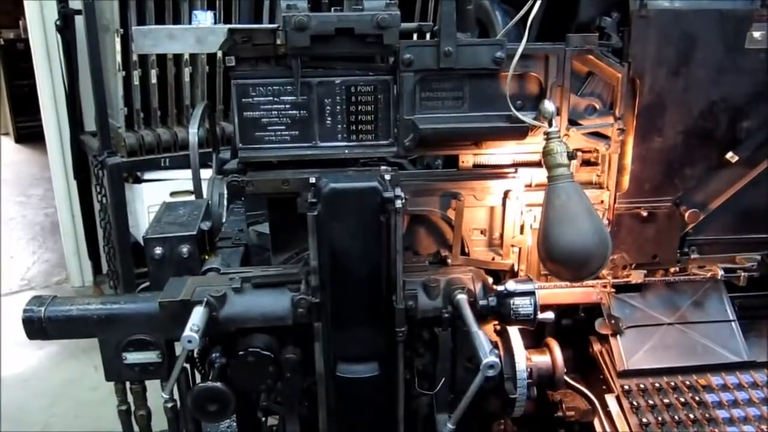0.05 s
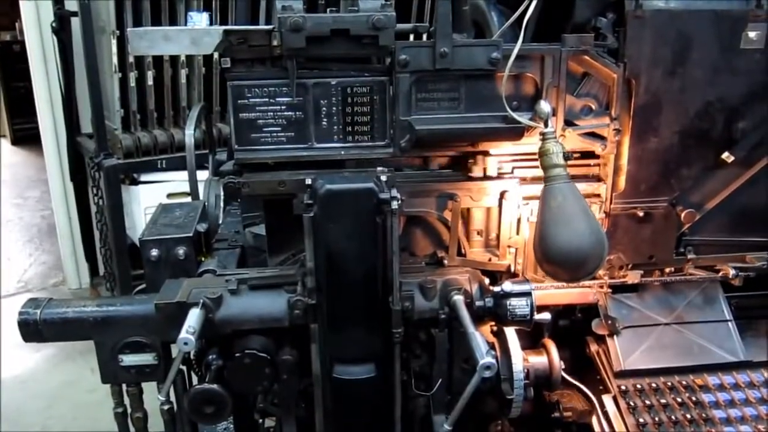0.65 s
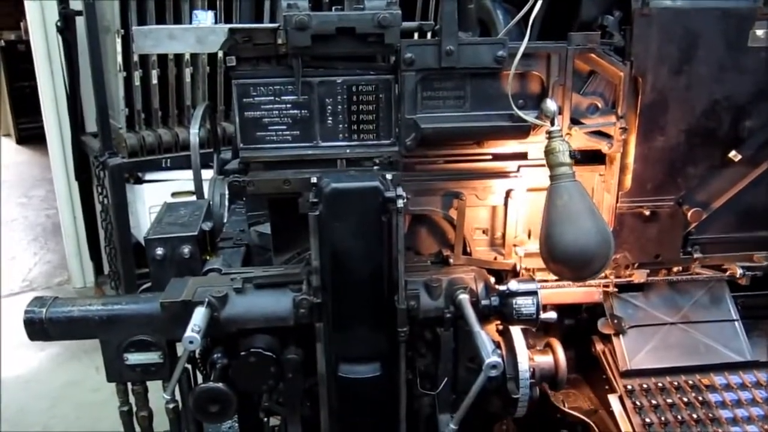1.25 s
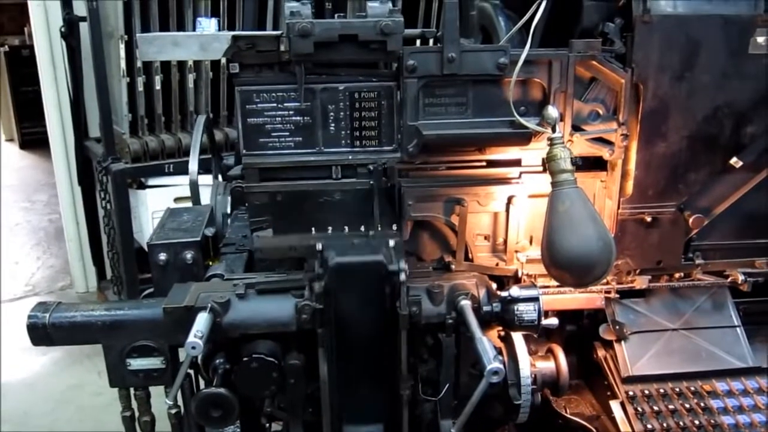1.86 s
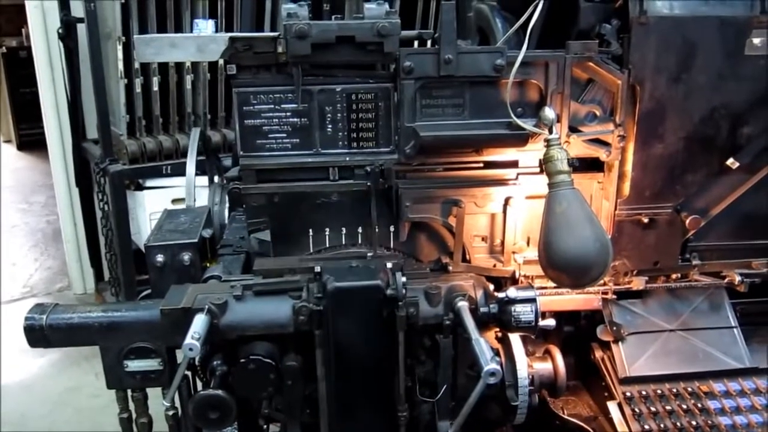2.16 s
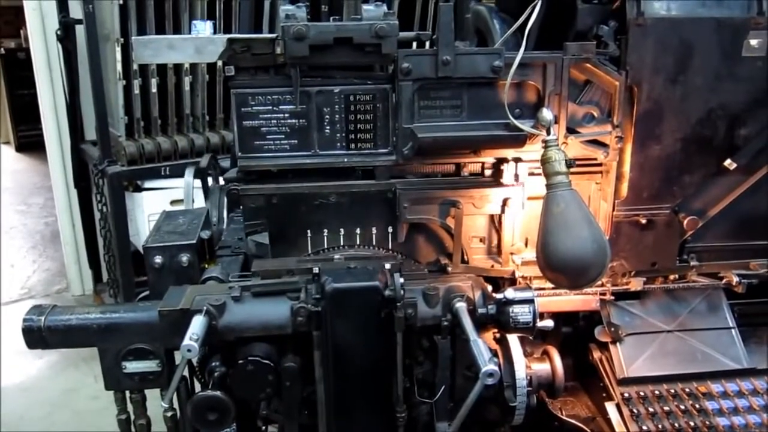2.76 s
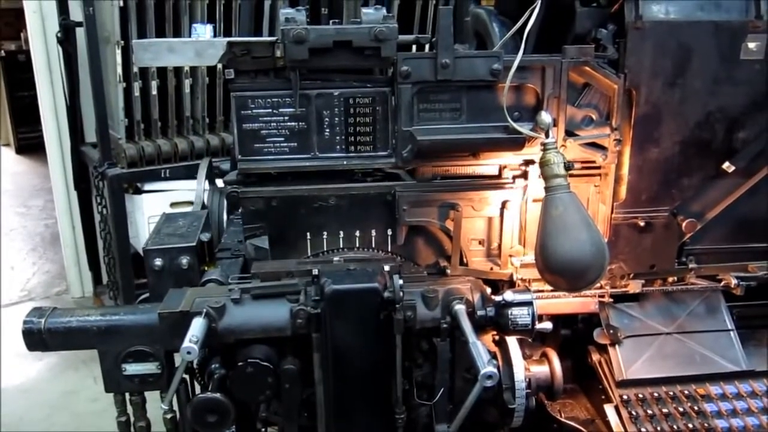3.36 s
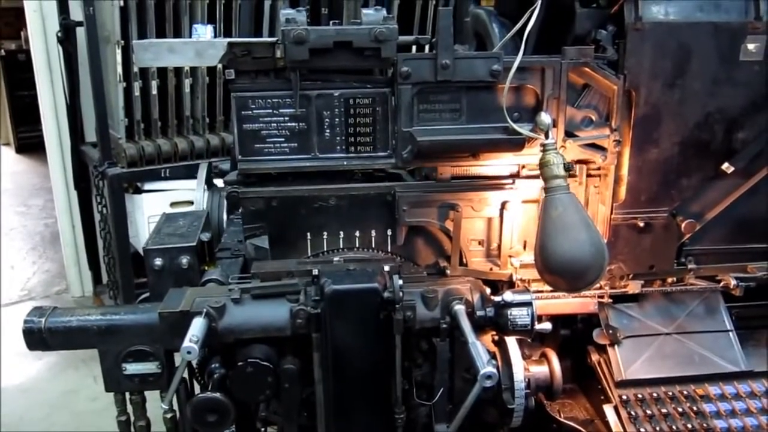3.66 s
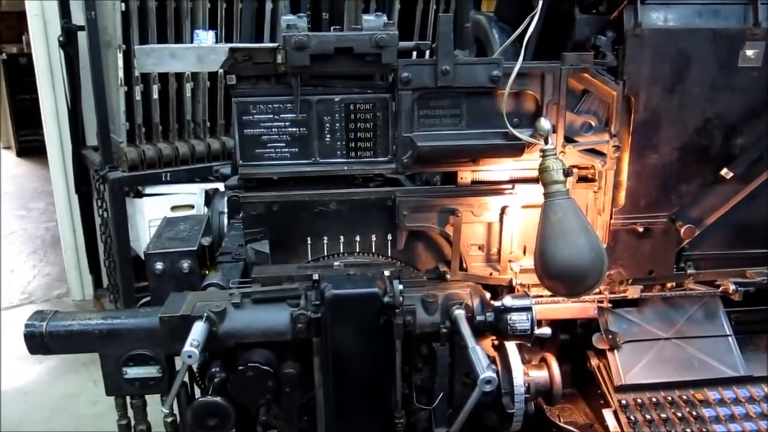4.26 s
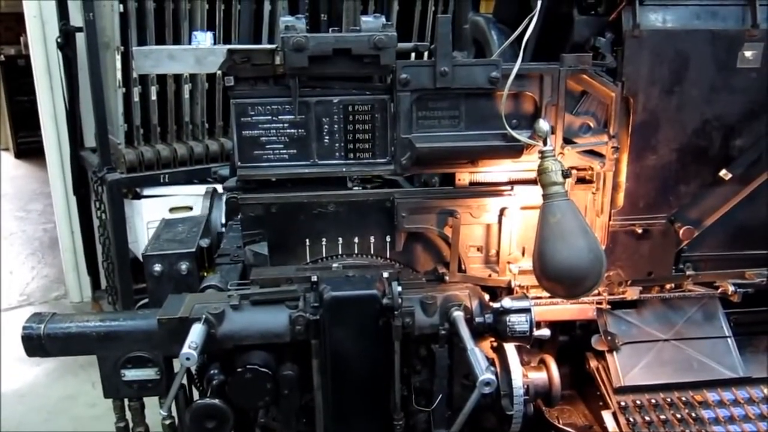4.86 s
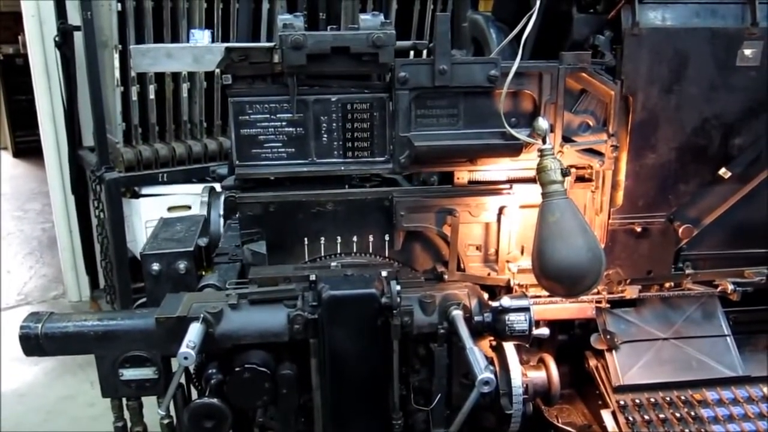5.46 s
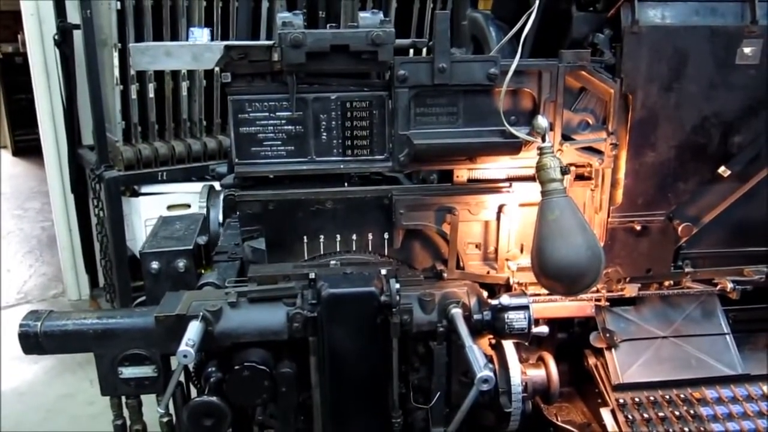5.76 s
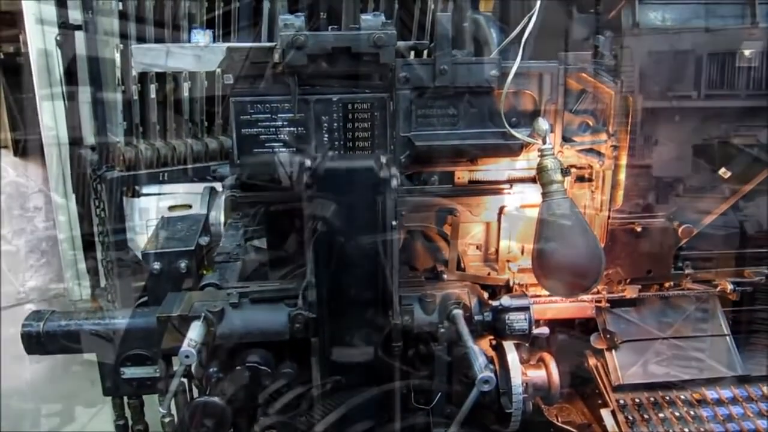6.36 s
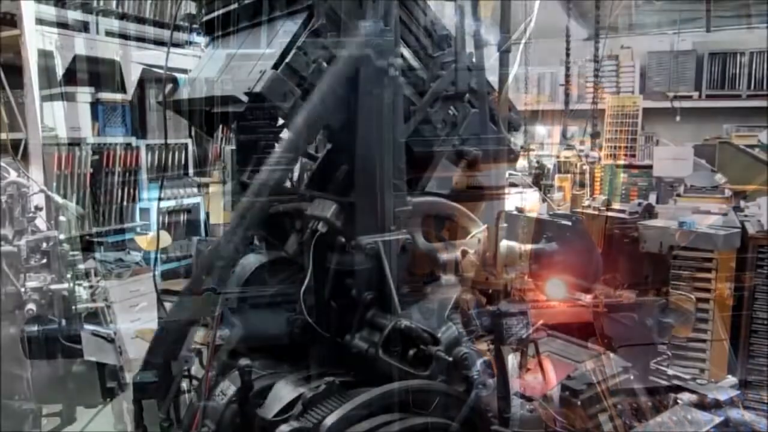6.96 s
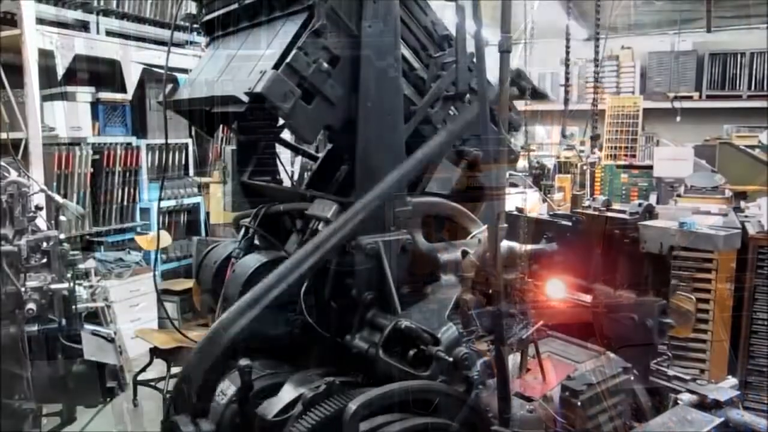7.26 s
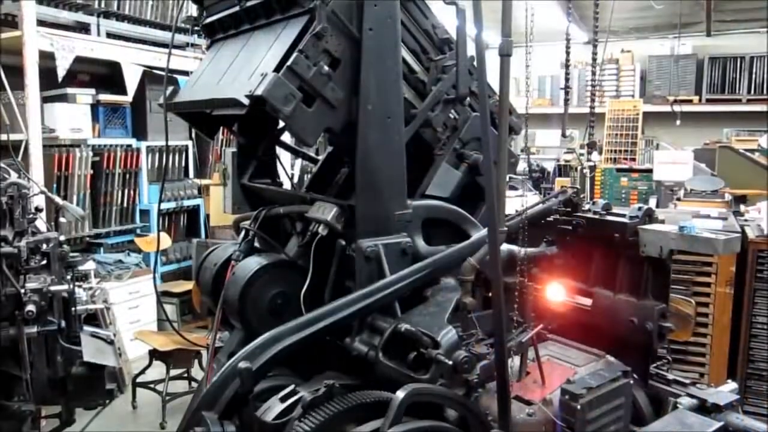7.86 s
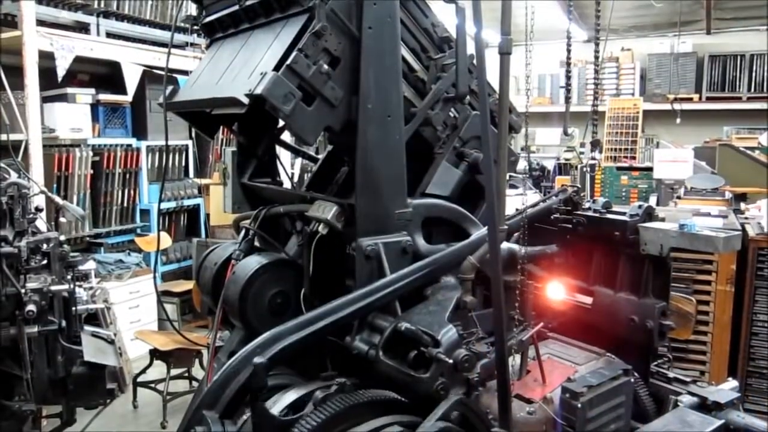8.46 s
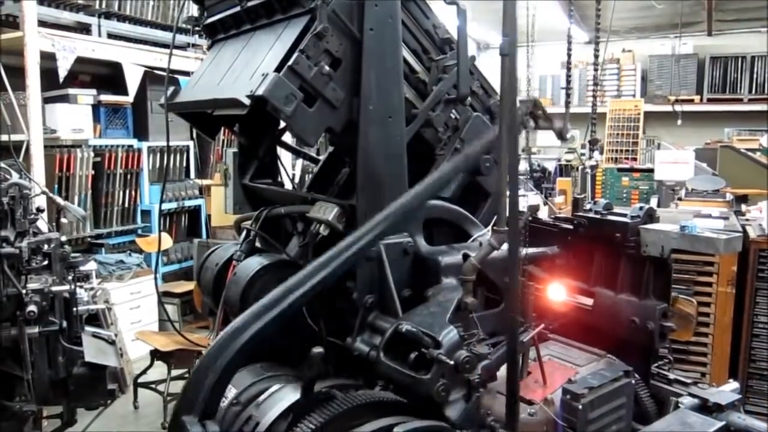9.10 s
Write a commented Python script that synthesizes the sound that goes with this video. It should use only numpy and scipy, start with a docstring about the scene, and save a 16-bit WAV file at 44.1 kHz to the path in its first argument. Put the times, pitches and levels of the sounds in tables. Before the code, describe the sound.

Close up in a workshop, a line-casting machine clanks and knocks unevenly over a steady motor rumble and a wavering gear whine. Carriages slide with a rattle and hiss, loose links chatter, and steel pieces give a brief bright jingle. After a lighter stretch with a sharp ping and a heavy thud, the machine gets busier: small brass moulds tick and drop, steel jingles in bursts and levers keep striking.

```python
"""A short rattling slide, then a clatter of steel blows: a line-casting machine runs through its cycle
in a print workshop, heard from close by. Cams throw levers against their stops, and heavy knocks add
a dull thud and a low ring. In between, carriages slide, loose links chatter, brass letter moulds
drop with a ping and thin steel pieces jingle, over the motor's rumble and its gears' wavering whine."""
import sys
import numpy as np
from scipy import signal
from scipy.fft import rfft, irfft, next_fast_len
from scipy.io import wavfile
from scipy.ndimage import uniform_filter1d

SR = 44100
rng = np.random.default_rng(int(sys.argv[2]) if len(sys.argv) > 2 else 0)


def inscribe(sig):
    """Save sig as 16-bit PCM at rate SR to the path in sys.argv[1].

    A 1-D sig is mono; a 2-D sig holds one channel per row.
    Samples are clipped to [-1, 1] before scaling.
    """
    pcm = np.round(np.clip(np.atleast_2d(sig).T, -1, 1) * 32767)
    wavfile.write(sys.argv[1], SR, pcm.astype(np.int16))


N = 402633


def amp(db):
    """Decibels to gain."""
    return 10 ** (np.asarray(db) / 20)


def unit(x):
    """Scales to rms 1."""
    return x / np.sqrt(np.mean(x ** 2) + 1e-20)


def curve_at(points, hz):
    """Reads a curve on a log-frequency axis."""
    f, value = np.transpose(points)
    return np.interp(np.log(hz + 1), np.log(f), value)


def automation(points):
    """Draws a line through (time, value) breakpoints, sample by sample."""
    return np.interp(np.arange(N) / SR, *np.transpose(points))


def add(mix, s, sound):
    """Mixes a sound into a stereo track at time s."""
    part = mix[:, max(round(s * SR), 0):][:, :sound.shape[1]]
    part += sound[:, :part.shape[1]]


def drift(rate_hz):
    """Slow random modulation of rms 1, rolling off above rate_hz."""
    hz = np.fft.rfftfreq(N, 1 / SR)[:4000]
    spectrum = rfft(rng.standard_normal(8192))[:4000] / (1 + (hz / rate_hz) ** 4)
    return unit(np.interp(np.linspace(0, 8191, N), np.arange(8192), irfft(spectrum, 8192)))


# Stereo image, narrow in the bass and wide on top: (frequency [Hz], left-right correlation [0..1])
STEREO_CORRELATION = [(30, 0.9), (150, .985), (500, 0.97), (950, 0.9), (1350, 0.83), (2000, 0.53),
                      (4000, 0.19), (8000, 0.56), (12000, 0.03)]


def colour(pair, eq_db=np.zeros_like):
    """Gives two unrelated signals a minimum-phase EQ (dB as a function of Hz) and the stereo image."""
    size = 2 * next_fast_len(pair.shape[1] // 2 + 1024)
    hz = np.fft.rfftfreq(size, 1 / SR)
    cepstrum = irfft(np.log(amp(eq_db(hz))))
    cepstrum[1:size // 2] *= 2  # folded forward, so nothing rings ahead of a hit
    cepstrum[size // 2 + 1:] = 0
    a, b = rfft(pair, size) * np.exp(rfft(cepstrum))
    correlation = curve_at(STEREO_CORRELATION, hz)
    mid, side = a * np.sqrt((1 + correlation) / 2), b * np.sqrt((1 - correlation) / 2)
    return irfft(np.array([mid + side, mid - side]))[:, :pair.shape[1]]


def ticks(per_s, spread_db):
    """Random tiny impacts of unequal size."""
    size = amp(spread_db * np.minimum(rng.exponential(1, N), 4))
    return size * (rng.random(N) < per_s / SR)


def contact_bed(spectrum, per_s, spread_db, decay_s, steady):
    """Many light, short contacts over even rubbing; steady is the rubbing's power relative to theirs."""
    power = signal.lfilter([1], [1, -np.exp(-2 / (decay_s * SR))], ticks(per_s, spread_db) ** 2)
    envelope = np.sqrt(power / power.mean() + steady)
    return unit(colour(envelope * rng.standard_normal((2, N)), lambda hz: curve_at(spectrum, hz)))


# Reverb time of the workshop: (frequency [Hz], t60 [s])
ROOM_DECAY = [(150, 0.7), (500, 0.35), (2000, 0.5), (5000, 0.52), (12000, 0.46)]


def workshop(send, build_s=0.0013):
    """Dense reflections from shelves and machines, each band dying at its own speed."""
    hz, t, bands = signal.stft(rng.standard_normal((2, SR)), SR, nperseg=256)
    bands = bands * amp(-60 * t / curve_at(ROOM_DECAY, hz)[:, None])
    tail = signal.istft(bands, SR, nperseg=256)[1]
    tail = colour(tail * (1 - np.exp(-np.arange(tail.shape[1]) / SR / build_s)))
    return signal.fftconvolve(send, tail / np.linalg.norm(tail[0]), axes=1)[:, :N]


# Load on the drive, which also rides the chatter and the light taps: (time [s], level [dB])
DRIVE_LOAD = [(0.0, -33), (0.46, -39.5), (1.02, -34), (1.17, -41), (1.42, -43.5), (1.6, -39.5), (1.86, -36),
              (2.52, -46.5), (3.23, -40), (4.32, -41), (4.5, -45.5), (4.78, -46.5), (5.29, -40.5),
              (5.87, -38.5), (6.13, -36), (7.14, -38.5), (7.27, -35.5), (7.98, -41.5), (8.21, -40),
              (9.13, -42.5)]
USUAL_LOAD_DB = -40
# EQ of the motor and belts: (frequency [Hz], gain [dB])
RUMBLE_EQ = [(20, -40), (45, -9), (85, -10.5), (130, -5.5), (230, 2.5), (290, 2), (340, 4), (420, -2),
             (650, 2.5), (1000, -5.5), (2000, -8), (6000, -46)]
# Hum and gear tones: (pitch [Hz], level at usual load [dB], pitch waver [ratio], level flutter [ratio])
DRIVE_TONES = [(61, -65.5, 0.0024, 0.3), (120.8, -61, 0.0023, 0.89), (235.3, -51, 0.00854, 1),
               (339.8, -48.5, 0.0113, .8), (358, -45.5, 0.0049, 0.54)]


def drive():
    """Motor and belts rumble; hum and gear tones waver; both swell with the load."""
    load_db = automation(DRIVE_LOAD)
    rumble = contact_bed(RUMBLE_EQ, per_s=69, spread_db=5.5, decay_s=0.0058, steady=6.3)
    tones = np.zeros(N)
    for hz, db, waver, flutter in DRIVE_TONES:
        turns = np.cumsum(hz * (1 + waver * drift(rate_hz=4.15))) / SR
        tones += amp(db) * unit((1 + flutter * drift(rate_hz=9.5)) * np.sin(2 * np.pi * turns))
    return rumble * amp(load_db + 1.5) + tones * amp(load_db - USUAL_LOAD_DB)


def travel(start, end, rise_s=0.021, fall_s=0.043):
    """Envelope of a movement: it gathers speed, runs evenly and dies away after its end."""
    t = np.arange(N) / SR
    return np.clip((t - start) / rise_s, 0, 1) * np.exp(-np.maximum(t - end, 0) / fall_s)


# EQ of the shaking base: (frequency [Hz], gain [dB])
BASE_EQ = [(20, -12), (40, -3), (70, 0), (120, 3), (200, -4), (600, -45)]
# A carriage or elevator travels along its guide:
# (start [s], end [s], rattle [dB], hiss [dB], base rumble [dB], guide pitch [Hz])
SLIDE_CUES = [(0.0, 0.21, -41, -62, -41.5, 3300), (0.42, 0.704, -37.5, -42, -58, 4260),
              (0.73, 1.176, -33.5, -39.5, -50.5, 4300), (1.414, 1.552, -27.5, -47, -49, 1820),
              (1.994, 2.128, -32.5, -31, -65, 2380), (2.318, 2.457, -30, -55, -70, 2750),
              (2.943, 3.446, -40, -50, -59, 5600), (4.1, 4.377, -40, -61, -52, 2400),
              (5.14, 5.63, -42.5, -44, -62, 4100), (5.746, 6.3, -35.5, -46, -52.5, 2350),
              (6.323, 6.62, -27, -40.5, -48.5, 2170), (6.71, 7.15, -34.5, -33.5, -69, 3580),
              (7.352, 7.492, -28.5, -33, -60, 2250), (7.696, 7.907, -33, -37.5, -58, 3700),
              (8.228, 8.433, -28.5, -37, -67, 2200), (8.742, 8.873, -30, -41, -60, 1980)]


def slides(guide_db=-10, guide_q=10):
    """The moving carriages make their guides sing and shake the base."""
    guides, shaking = np.zeros((2, N)), np.zeros(N)
    rubbing = colour(rng.standard_normal((2, N)))
    for start, end, rattle_db, _, base_db, hz in SLIDE_CUES:
        moving = travel(start, end)
        ring = unit(signal.lfilter(*signal.iirpeak(hz, guide_q, SR), rubbing))
        guides += ring * amp(rattle_db + guide_db) * moving
        shaking += amp(base_db) * moving
    base = unit(colour(rng.standard_normal((2, N)), lambda hz: curve_at(BASE_EQ, hz)))
    return guides + shaking * base


def clinks(per_s, low_hz, high_hz, ring_s, spread_db, count=24, stereo_lag_s=0.00007):
    """Small brass pieces tap their guides, each with its own pitch and place in the stereo image."""
    t = np.arange(2048) / SR
    taps, piece = ticks(per_s, spread_db), rng.integers(0, count, N)
    lags = stereo_lag_s * rng.standard_normal(count)
    pitches = np.geomspace(low_hz, high_hz, count) * rng.uniform(1.0, 1.03, count)
    notes = [np.sin(2 * np.pi * hz * np.array([t, t + lag])) * np.exp(-t / ring_s)
             for hz, lag in zip(pitches, lags)]
    out = np.zeros((2, N))
    for at in np.flatnonzero(taps):
        add(out, at / SR, taps[at] * notes[piece[at]])
    return unit(out)


# EQs of the loose links and of the hiss of bearings and slides: (frequency [Hz], gain [dB])
LINK_EQ = [(250, -16.5), (600, 0), (1000, 2.5), (1500, 2.5), (2300, 5), (3100, 3.5), (4300, 0.5),
           (6500, -11), (9000, -9), (15000, -69)]
HISS_EQ = [(1500, -24), (4000, -15), (6500, 5), (9500, 1), (12000, 1.5), (15000, -14)]


def chatter(loose_db=4, bearings_db=-12.5):
    """Links tick, brass clinks and bearings hiss with the load; each slide adds rattle and hiss."""
    load_db = automation(DRIVE_LOAD)
    rattle_gain, hiss_gain = amp(load_db + loose_db), amp(load_db + bearings_db)
    for start, end, rattle_db, hiss_db, _, _ in SLIDE_CUES:
        moving = travel(start, end)
        rattle_gain = np.hypot(rattle_gain, amp(rattle_db) * moving)
        hiss_gain = np.hypot(hiss_gain, amp(hiss_db) * moving)
    links = contact_bed(LINK_EQ, per_s=290, spread_db=5.5, decay_s=0.01, steady=1.0)
    brass = clinks(per_s=110, low_hz=1800, high_hz=6500, ring_s=0.0025, spread_db=3) * amp(-10)
    hiss = contact_bed(HISS_EQ, per_s=220, spread_db=4.0, decay_s=0.0063, steady=0.86)
    return (links + brass) * rattle_gain + hiss * hiss_gain


def light_taps(count=45, usual_db=-36, load_share=1.14, spread_db=5, low_hz=1000, high_hz=5000):
    """Pawls and links tap at random all through the cycle, harder under load."""
    load_db = automation(DRIVE_LOAD)
    out = np.zeros((2, N))
    for k, (when, force, pitch) in enumerate(rng.random((count, 3))):
        at = int((k + when) / count * N)
        level_db = usual_db + load_share * (load_db[at] - USUAL_LOAD_DB) + spread_db * (force - 0.5)
        hz = low_hz * (high_hz / low_hz) ** pitch
        add(out, at / SR, blow(level_db, decay_s=0.018, thud_db=8, bright_db=1, peak_hz=hz, peak_db=11))
    return out


# Modes of the thin steel pieces: (frequency [Hz], level [dB], t60 [s])
JINGLE_MODES = [(2180, -3, .05), (3400, -12, .05), (5000, 0.5, 0.12), (6240, -4, 0.15), (6600, -5.5, 0.067),
                (8930, -2, 0.099), (10740, -3, 0.08), (10830, -4, 0.08), (12300, 0, 0.086),
                (14360, -17, .07), (14640, -14, .07)]
# Their bouts of jingling: (start [s], end [s], level [dB])
JINGLE_CUES = [(1.591, 1.63, -27), (1.626, 1.65, -26.5), (1.693, 1.75, -45), (3.242, 3.252, -48),
               (3.3, 3.312, -40), (6.199, 6.23, -27.5), (6.232, 6.391, -32), (6.444, 6.66, -41),
               (6.74, 7.166, -36), (7.291, 7.497, -30.5), (7.599, 7.73, -42), (7.727, 7.80, -32),
               (7.829, 7.93, -41.5), (8.091, 8.237, -29.5), (8.30, 8.43, -40)]


def jingle(knocks_per_s=65, mistune=0.011, softest_db=-6, force_db=13, rise_s=0.0016, settle_db_per_s=18):
    """Thin steel pieces, alike but never quite in tune, are jolted, then knock together as they settle."""
    t = np.arange(4096) / SR
    hz, db, t60 = np.transpose(JINGLE_MODES)[:, :, None]
    decays = amp(db - 60 * t / t60) * (1 - np.exp(-t / rise_s))
    decays /= np.sqrt(np.sum(decays ** 2) / 2 * knocks_per_s / SR)
    out = np.zeros((2, N))
    for start, end, level_db in JINGLE_CUES:
        draws = rng.random((32, 3 + 3 * len(hz)))
        draws[0, :3] = 0, 1, 0.5  # the jolt is prompt, full and in tune
        for since, chance in zip(np.arange(0, end - start, 1 / knocks_per_s), draws):
            late, force, piece = chance[:3]
            weight, phase, lead = chance[3:].reshape(3, -1, 1)  # each knock wakes the modes differently
            turns = hz * (1 + mistune * (2 * piece - 1)) * t + np.array([phase, phase + lead / 2])
            knock = ((0.5 + weight) * decays * np.sin(2 * np.pi * turns)).sum(1)
            knock_db = level_db + softest_db + force_db * force - settle_db_per_s * since
            add(out, start + since + late / knocks_per_s, amp(knock_db) * knock)
    return out


# Hard landings of small brass pieces, mostly letter moulds: (time [s], level [dB], pitch [Hz])
PING_CUES = [(1.623, -16, 2240), (3.021, -19.5, 5300), (3.599, -11.5, 5200), (3.605, -13.5, 4780),
             (5.858, -21, 2570), (5.92, -12, 2260), (6.024, -17.5, 2120), (6.173, -22, 3000),
             (6.639, -13.5, 2170), (6.72, -15.5, 2270), (6.845, -16, 3650), (6.921, -15.5, 3610),
             (7.024, -16.5, 2190), (7.112, -22, 3350), (8.397, -9, 2080), (8.903, -19, 2880)]


def falling_moulds(run_start_s=5.9, run_end_s=7.3, run_db=-38):
    """A run of brass moulds ticks into the channels; hard landings through the cycle click and ping."""
    run = clinks(per_s=28, low_hz=2050, high_hz=3500, ring_s=0.005, spread_db=1)
    out = run * amp(run_db) * travel(run_start_s, run_end_s)
    for s, ping_db, hz in PING_CUES:
        add(out, s, blow(ping_db - 11, decay_s=0.0047, thud_db=3, bright_db=1, peak_hz=hz, peak_db=16))
        add(out, s, clean_note(hz, ping_db - 1, ring_s=0.0079))
    return out


# Modes of the cast-iron frame: (frequency [Hz], level [dB], t60 [s])
FRAME_MODES = [(118, -19, 0.21), (156.6, -9.5, 0.091), (192, -4, 0.19), (222, 1.5, 0.11), (232, -11, 0.21),
               (251.2, -1, 0.23), (488, -5.5, 0.08)]
# Heavy knocks: (time [s], low ring [dB], dull thud [dB])
KNOCK_CUES = [(0.05, -34, -30), (1.187, -55, -32), (1.456, -29, -42), (1.53, -35, -40), (2.03, -33, -44),
              (2.339, -48, -21), (3.349, -41, -48), (4.384, -31.5, -7), (5.881, -22, -45),
              (6.349, -30, -38), (6.675, -24.5, -42), (6.868, -36, -48), (7.668, -23.5, -29),
              (8.308, -25.5, -44), (8.353, -30, -46), (8.378, -29.5, -46)]


def heavy_knocks(thud_s=0.00047, thud_rise_s=0.00036, ring_rise_s=0.0041, mistune=0.043):
    """Heavy knocks give a short, dull low thud and a low ring."""
    t = np.arange(SR // 2) / SR
    out = np.zeros((2, N))
    thud = 2 * (1 - t / thud_s) * np.exp(-t / thud_s) * (1 - np.exp(-t / thud_rise_s))
    for s, ring_db, thud_db in KNOCK_CUES:
        ring = np.zeros(len(t))
        for hz, db, t60 in FRAME_MODES:
            polarity, detune = rng.standard_normal(2)  # each spot wakes the modes differently
            mode = np.sin(2 * np.pi * hz * (1 + mistune * detune) * t)
            ring += np.sign(polarity) * amp(db - 60 * t / t60) * mode
        ring *= 1 - np.exp(-t / ring_rise_s)
        add(out, s, (amp(ring_db) * ring + amp(thud_db) * thud)[None])
    return out


# EQ of steel striking steel: (frequency [Hz], gain [dB])
STEEL_EQ = [(30, -27.5), (90, -55), (170, -12), (280, -8), (430, -4), (890, 1), (1590, -0.5), (2340, 3),
            (3930, 1), (6600, -5), (9700, -8.5), (12000, -14.5), (15000, -25.5)]


def blow(level_db, decay_s, thud_db, bright_db, peak_hz, peak_db, pan_db=0):
    """Metal lands with a crack, a burst of micro-contacts and a short ring, broadly resonant at peak_hz."""
    crack_db, crack_s, ring_db, ring_s = -1, 0.0013, -17, 0.033
    t = np.arange(8192) / SR
    roughness_db = 2.03 * unit(uniform_filter1d(rng.standard_normal(len(t)), size=50))
    contacts = np.exp(-t / decay_s) * (1 - np.exp(-t / (0.36 * decay_s))) * amp(roughness_db)
    crack = amp(crack_db) * np.exp(-t / crack_s)
    ring = amp(ring_db) * np.exp(-t / ring_s) * (1 - np.exp(-t / decay_s))
    envelope = np.hypot(contacts + crack, ring)
    envelope /= np.sqrt(np.sum(envelope ** 2) / (0.02 * SR))  # the energy of 20 ms at rms 1
    modes_hz = np.exp(rng.uniform(np.log(1500), np.log(14000), 18))

    def eq_db(hz):
        thud = thud_db / (1 + (hz / 800) ** 2)
        edge = bright_db * hz ** 4 / (hz ** 4 + 6000 ** 4)
        resonance = 14 * np.tanh(peak_db / 14) / (1 + ((hz - peak_hz) / (80 + 0.16 * peak_hz)) ** 2)
        off_mode = np.min(abs(hz[:, None] - modes_hz) / (25 + modes_hz / 110), axis=1)
        clang = 7 / (1 + off_mode ** 2) - 2  # each piece has sharp modes of its own, a few dB proud
        return level_db + curve_at(STEEL_EQ, hz) + thud + edge + resonance + clang
    return colour(envelope * rng.standard_normal((2, len(t))), eq_db) * amp([[pan_db / 2], [-pan_db / 2]])


def clean_note(hz, level_db, ring_s=0.0074, rise_s=0.00021, low_cut_hz=1700):
    """The short, clean note of struck metal; it fades out below about 1.7 kHz."""
    t = np.arange(8192) / SR
    stereo_phase = rng.random() + np.array([[0], [hz / 15000 * rng.standard_normal()]])
    note = np.sin(2 * np.pi * (hz * t + stereo_phase)) * np.exp(-t / ring_s) * (1 - np.exp(-t / rise_s))
    return amp(level_db + curve_at(STEEL_EQ, hz)) * note / (1 + (low_cut_hz / hz) ** 4)


# Steel blows, mostly levers hitting their stops, some carriages bumping and scraping along their guides: #
# (time [s], level [dB], rattle decay [s], thud [dB], brightness [dB], centre of the blow's broad resonance
# [Hz])
BLOW_CUES = [(0.251, -18, 0.011, 9, 8.5, 3370), (0.274, -13, 0.0075, 1, 2, 1500),
             (0.287, -22, 0.0095, -18, 18.5, 4160), (0.297, -21.5, 0.0041, -11, 20.5, 3670),
             (0.321, -10.5, 0.012, -14, 6, 1330), (0.42, -19, 0.0062, -15, -4, 2700),
             (0.486, -22.5, 0.034, -11, 6, 4180), (0.591, -21, 0.032, -1, 3.5, 4270),
             (0.709, -33, .009, 7, 23.5, 6200), (0.731, -16, .035, 4, 6, 4040),
             (0.953, -22.5, 0.014, 3, 3, 4140), (1.067, -15, 0.015, 2, 1, 4230),
             (1.103, -25, 0.019, 16, 8, 4160), (1.18, -25, 0.0033, 8, 15, 3500),
             (1.185, -14, 0.0087, 2.5, -8, 3430), (1.189, -15, 0.0057, -2, 4.5, 930),
             (1.368, -11.5, 0.015, -16, -1, 780), (1.453, -11.5, .008, -6, -8, 2580),
             (1.463, -15.5, .014, 3.5, -6, 1140), (1.533, -13.5, .009, -18, -22, 1120),
             (1.593, -24, 0.015, 7, 7, 4800), (1.639, -10.5, .011, -14, -2.5, 1290),
             (1.701, -22.5, .02, -7, 12.5, 1600), (1.887, -25.5, .01, 12, -15, 1870),
             (1.953, -13.5, 0.0049, -26, 2.5, 1510), (1.98, -12.5, 0.007, -12, -24, 736),
             (2.028, -14, .005, -9, -1, 2270), (2.062, -8.5, 0.007, -20, -4, 2000),
             (2.078, -15.5, 0.0062, -2, 4, 754), (2.136, -21.5, 0.0099, 2, -19, 550),
             (2.215, -27, 0.014, 11, -19, 1760), (2.281, -26.5, 0.0088, 14.5, 11, 3830),
             (2.337, -12, 0.0014, -16, 7.5, 690), (2.381, -10.5, 0.029, -28, -1, 610),
             (2.447, -26.5, 0.0058, -14, 10.5, 2700), (2.733, -14.5, .006, -4, 1.5, 715),
             (2.858, -42.5, .005, 4, 26.5, 4330), (2.999, -21.5, 0.022, 2, 3, 550),
             (3.175, -23, 0.021, 5, 6.5, 1290), (3.219, -20.5, 0.018, -9, 7.5, 1400),
             (3.353, -26, 0.032, 15, -3, 700), (3.478, -21.5, 0.022, 1, 9.5, 2500),
             (3.599, -21, 0.009, -6, 12, 5150), (3.625, -17.5, 0.0076, -2, 7, 2780),
             (3.662, -19.5, 0.0072, -14, 0, 610), (3.68, -17.5, 0.0051, -10, 2.5, 4320),
             (4.009, -30.5, .009, -4, 14, 3000), (4.05, -26, 0.0075, -7, 15, 2970),
             (4.09, -22.5, .011, 7, 10, 980), (4.101, -19.5, 0.012, 13.5, 6, 685),
             (4.127, -15, 0.02, -4, 7, 1130), (4.222, -29, 0.012, 20, 12.5, 556),
             (4.383, -8, 0.004, 2.5, 0.5, 563), (4.387, -14.5, .0054, 9, -4, 696),
             (4.399, -17, 0.018, -1, -2, 1000), (4.492, -26.5, 0.03, 1, 2, 2620),
             (4.719, -32, .02, 7, 1, 4240), (5.18, -26.5, 0.022, 17.5, 1, 1520),
             (5.551, -16, 0.028, -3.5, -7, 740), (5.645, -16, 0.0065, -13, 2.5, 970),
             (5.787, -20.5, 0.015, -3, -2, 6800), (5.882, -9.5, 0.0076, -9, -10.5, 1410),
             (5.933, -22, 0.027, 4, 9, 2870), (5.956, -18, 0.011, 0, 2, 2080),
             (6.06, -28.5, .016, 15, 14, 5070), (6.196, -17, 0.0064, 2.5, -12, 700),
             (6.235, -18, 0.032, 15.5, 0, 2100), (6.275, -13.5, 0.026, -3, 1.5, 970),
             (6.33, -19.5, 0.0034, 6, 9.5, 5800), (6.348, -8, 0.024, -6, -8, 860),
             (6.45, -18, 0.0035, -7, 11, 5130), (6.475, -14, 0.0089, -4, -35, 710),
             (6.66, -19.5, 0.014, 13, 16.5, 3120), (6.676, -8.5, .0056, -9, -11, 1680),
             (6.755, -15, 0.0044, -16, -3, 1170), (6.811, -16.5, .013, 5.5, -3, 550),
             (6.87, -11.5, 0.0082, 1, -6.5, 5620), (6.98, -14.5, 0.0053, -19, 9.5, 2980),
             (7.111, -20.5, 0.0042, -2, 0, 3490), (7.162, -20.5, 0.0074, 3, -14, 1380),
             (7.265, -19.5, 0.015, 8, -20, 1820), (7.293, -18, .013, -3, -6, 2160),
             (7.338, -19, .016, -5, 7, 2230), (7.374, -23, 0.03, 1.5, 20.5, 3260),
             (7.489, -16, 0.0027, -20, 5, 1810), (7.61, -16.5, .029, -2, -3, 740),
             (7.668, -8.5, 0.023, -0.5, -4, 1540), (7.78, -13.5, 0.0065, -9, 8.5, 1680),
             (7.911, -30, 0.015, 8, 3, 3640), (7.968, -31, .011, 0, -5, 2620),
             (8.12, -18.5, 0.016, 0, 7, 1640), (8.169, -20, 0.034, -5, 13.5, 1850),
             (8.29, -24.5, 0.0027, -6, 13, 4960), (8.308, -16.5, 0.0065, 0, -23, 2140),
             (8.354, -12, 0.008, 4, -19, 2140), (8.384, -11, 0.014, 0.5, -9, 1050),
             (8.643, -14, .044, -12, -3, 960), (8.673, -23, 0.013, 3, 17.5, 4650),
             (8.772, -22, 0.014, -7, 5, 2250), (8.824, -19.5, 0.0067, 0, 0, 754),
             (8.902, -12, .005, -41, 1.5, 3550), (8.961, -28, 0.012, 21, 7, 860)]


def steel_blows(peak_db=7.5, note_db=-3.5, pan_db=0.54):
    """Cams throw steel levers against their stops and carriages bump and scrape; blows with a high resonance
    also carry a clean note."""
    out = np.zeros((2, N))
    for s, level_db, decay_s, thud_db, bright_db, peak_hz in BLOW_CUES:
        add(out, s, blow(level_db, decay_s, thud_db, bright_db, peak_hz, peak_db, pan_db))
        add(out, s, clean_note(peak_hz, level_db + note_db))
    return out


def scene(hits_send_db=-8.5, jingle_send_db=-17):
    """The machine and its room; the jingling pieces are close and almost dry."""
    hits = steel_blows() + light_taps() + heavy_knocks() + falling_moulds()
    jingling = jingle()
    reverb = workshop(amp(hits_send_db) * hits + amp(jingle_send_db) * jingling)
    return hits + jingling + reverb + chatter() + slides() + drive()


# Balance between the two microphones: (frequency [Hz], left minus right [dB])
MIC_BALANCE = [(60, -.6), (400, -0.5), (1100, 0.5), (2100, -4), (4000, 0.2), (8000, -1), (12000, 2)]


def record(dry, notch_hz=8230, notch_width_hz=400, notch_db=-32, high_cut_hz=15900):
    """The microphones differ a little in colour; a deep notch cuts the treble near 8.2 kHz; peaks clip; a high
    cut follows."""
    size = next_fast_len(N + 4096)
    hz = np.fft.rfftfreq(size, 1 / SR)
    eq_db = notch_db / (1 + abs((hz - notch_hz) / notch_width_hz) ** 3)
    balance_db = curve_at(MIC_BALANCE, hz) * np.array([[0.5], [-0.5]])
    heard = irfft(rfft(dry, size) * amp(eq_db + balance_db), size)[:, :N]
    high_cut = signal.firwin(255, high_cut_hz, window=("kaiser", 9), fs=SR)
    return signal.oaconvolve(np.clip(heard, -1, 1), high_cut[None], "same")


dry = scene()
out = record(dry)
inscribe(out)
```